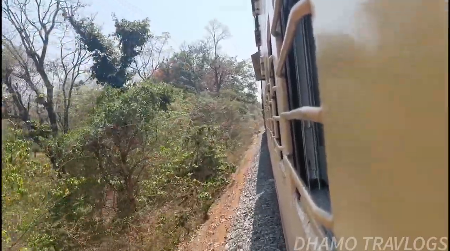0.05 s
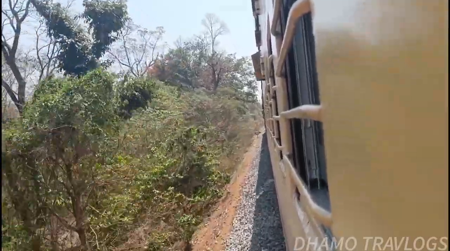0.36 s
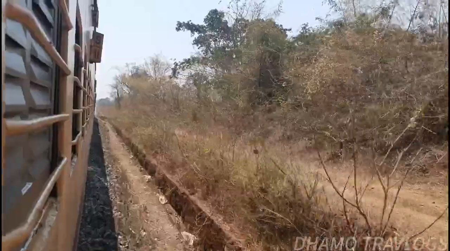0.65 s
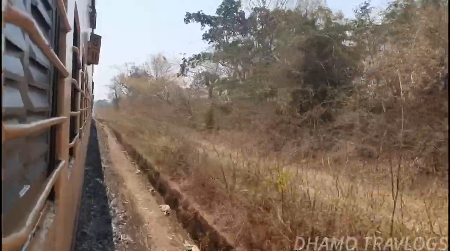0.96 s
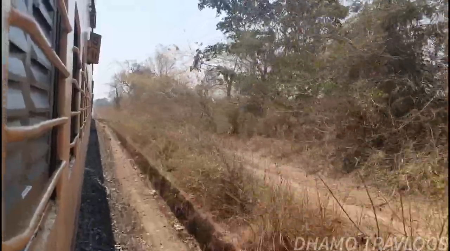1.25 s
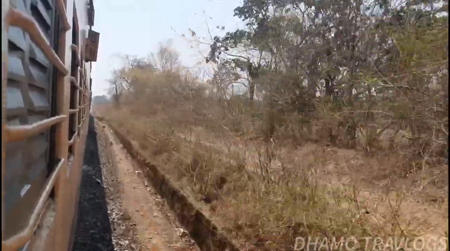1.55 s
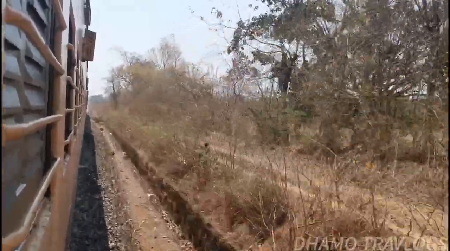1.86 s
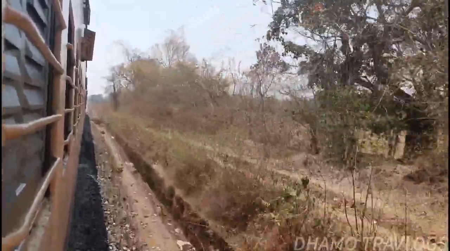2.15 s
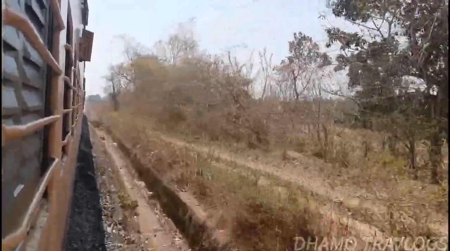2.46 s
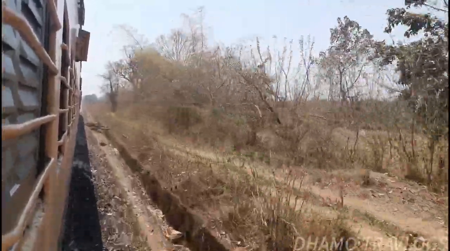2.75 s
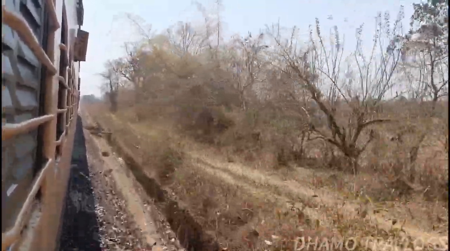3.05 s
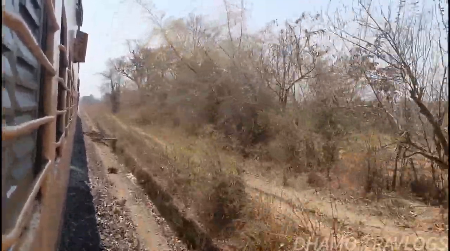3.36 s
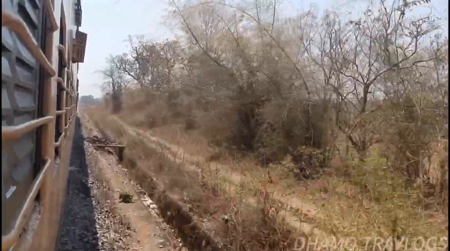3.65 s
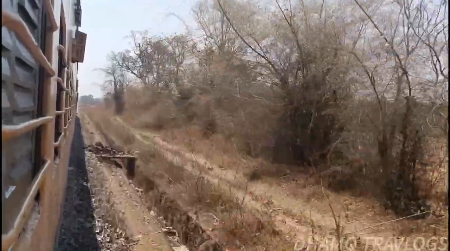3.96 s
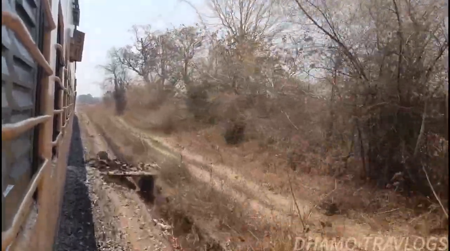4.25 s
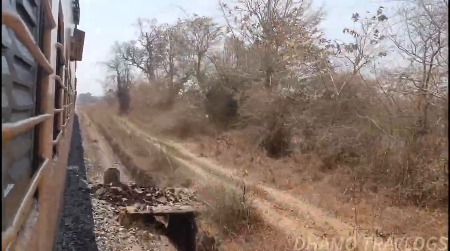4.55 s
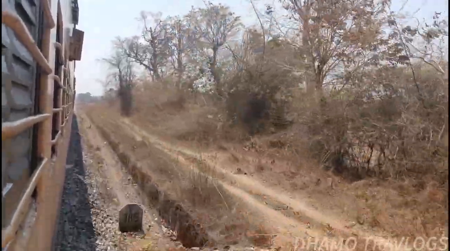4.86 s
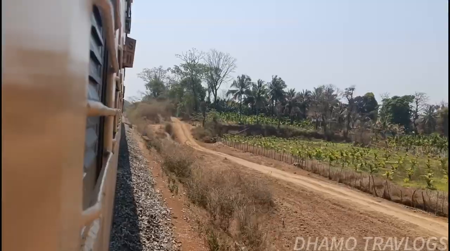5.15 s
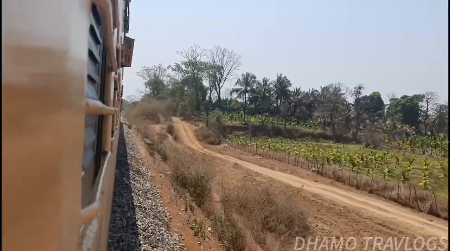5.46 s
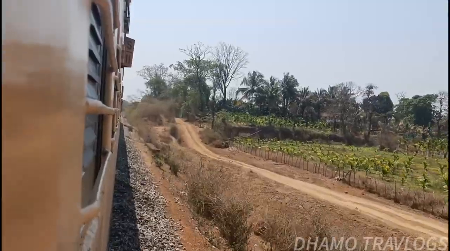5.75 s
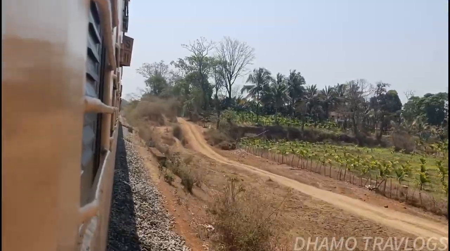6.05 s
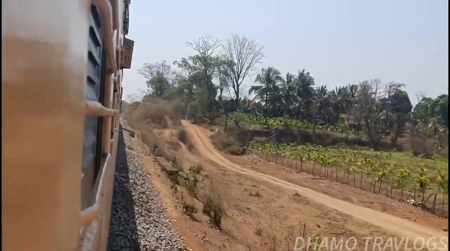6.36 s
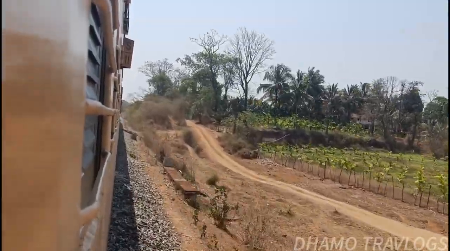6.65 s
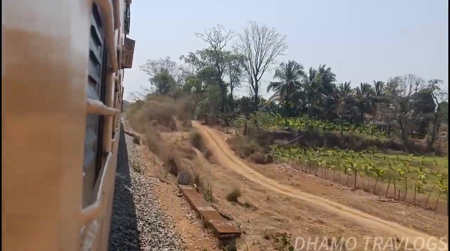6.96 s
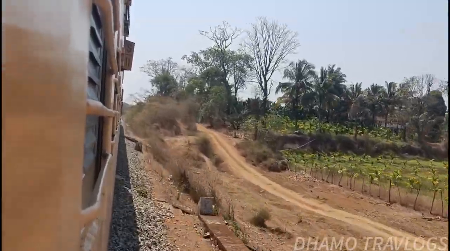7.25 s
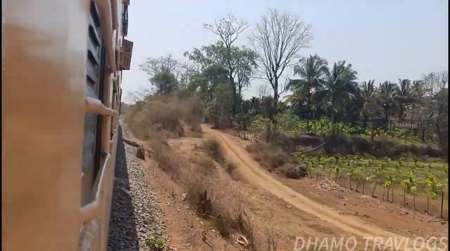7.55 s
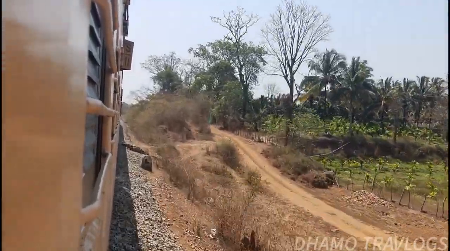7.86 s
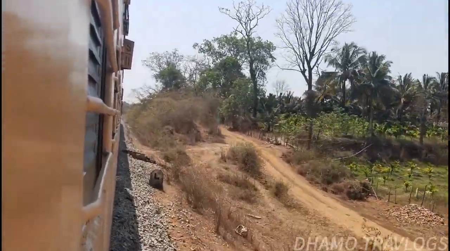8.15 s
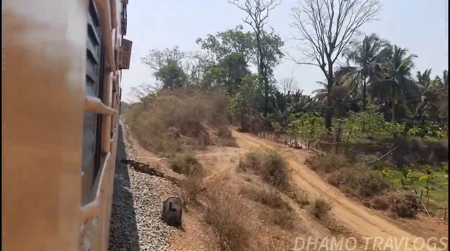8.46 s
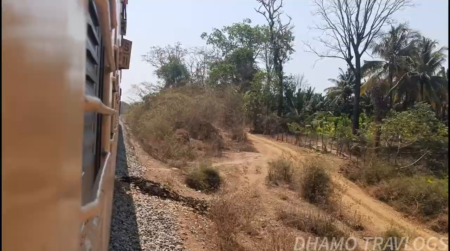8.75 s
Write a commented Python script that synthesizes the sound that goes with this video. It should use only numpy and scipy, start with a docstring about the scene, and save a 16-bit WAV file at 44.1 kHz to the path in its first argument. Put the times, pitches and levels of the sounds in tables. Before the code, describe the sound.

Wind buffets a microphone held outside the window of a moving train. For the first half second it is lighter and mostly on the left, sputtering with tiny whistling blips. At 0.6 seconds the sound cuts out with a click and swells back much louder, stronger on the right, with hollow booming gusts from about 0.8 to 1.6 seconds. Beneath the wind run a steady wheel roar and a low coach drone, while air hisses along the side in fluttering rushes. Dull knocks come from under the floor at around 4 and 4.7 seconds. At 5.1 seconds there is another brief dropout with a tick, and the same wind and rolling fade quickly back in. Faint knocks follow between 5.8 and 6.7 seconds. Sharp gusts hit from about 8 to 8.3 seconds, with firmer knocks near 8.1 and 8.8, and the noise continues until about 9 seconds.

```python
"""Wind at an open train window

A phone is held out of a moving train, in three positions joined by cuts that fade back in.
Turbulent air buffets each microphone port on its own, at point-blank range. From below come the roar
and odd knock of the wheels; along the coach side the slipstream hisses. A fast limiter on each
channel holds the gusts down and makes the roar and hiss flutter behind them."""
import sys
import numpy as np
from scipy import signal
from scipy.fft import rfft, irfft, next_fast_len
from scipy.io import wavfile
from scipy.ndimage import uniform_filter1d, minimum_filter1d

SR = 44100
rng = np.random.default_rng(int(sys.argv[2]) if len(sys.argv) > 2 else 0)


def int16_out(signal):
    """Quantize to a 16-bit WAV file."""
    q = np.round(np.clip(np.atleast_2d(signal).T, -1, 1) * 32767)
    wavfile.write(sys.argv[1], SR, q.astype(np.int16))


N = 396459
TIME = np.arange(N) / SR
SIZE = next_fast_len(N)
HZ = np.maximum(np.arange(SIZE // 2 + 1) * SR / SIZE, 1)
PORT_LAG_S = 0.00015   # sound from the wheels reaches the left port this much later
CUTOFF_HZ = 15400

# wind pressure spectrum at each port: f/Hz, relative level/dB
WIND_LEFT = [(18, -24), (35, -20), (58, -4), (80, -3.5), (115, 2), (200, 0), (290, -7), (400, -9),
             (480, -13), (590, -13.5), (750, -21.5), (1150, -31), (1800, -43.5), (3000, -66), (7000, -83.5),
             (15000, -130)]
WIND_RIGHT = [(18, -36.5), (35, -16), (58, -6), (130, 0.5), (210, -4), (280, -6.5), (380, -7), (470, -15.5),
              (570, -14), (720, -22), (1050, -29.5), (1600, -41.5), (3000, -62), (7000, -89), (15000, -130)]
# gusts (+) and lulls (-) at the microphone: t/s, half length/s, left rise/dB, right rise/dB
GUSTS = [(.02, 0.019, 7.5, 5), (.065, 0.015, 2, -2), (.118, 0.0091, -16, -3), (.155, 0.013, 2, -8),
         (.196, 0.01, -11, -7), (.362, 0.0089, 3, -3), (.46, 0.0075, 4.5, 1), (.578, 0.01, -8, 9),
         (.8, 0.097, -9, 2), (1.0, 0.075, -1.5, 4.5), (1.24, .05, 3.5, -2), (1.38, 0.044, -1, -1),
         (1.52, .05, -0.5, -2), (1.8, 0.05, -4.5, -2.5), (2.3, 0.14, 4.5, -1), (2.87, 0.043, 1, 0),
         (3.08, 0.063, 4, -3), (3.9, 0.14, -10, 2), (4.13, 0.17, 5.5, -4), (4.9, 0.079, -8.5, -3),
         (5.38, 0.21, 3, 5.5), (5.95, 0.039, -5.5, -1), (6.07, 0.024, 9, 0), (6.22, 0.022, 10, -2),
         (6.4, 0.069, -8, -6.5), (6.62, 0.045, -10.5, -7), (6.75, 0.011, 11, 4), (6.85, 0.068, -6, -4),
         (7.06, 0.026, 1, 2), (7.8, 0.061, -5, -0.5), (8.0, 0.041, -4, 11.5), (8.18, 0.031, 5, 2),
         (8.33, 0.02, 9, 9), (8.48, .043, -9.5, -0.5), (8.68, 0.1, -4.5, -3), (8.86, 0.052, 5, -5.5)]
# hardest eddies to slap a port, weighted by band: t/s, half length/s, left rise/dB, right rise/dB
EDDIES = [(.053, .003, 9.5, -5), (.063, 0.004, 8, 1), (.087, 0.0034, 5.5, 5), (.137, .004, -0.5, 3),
          (.163, 0.0044, 5, -2), (.217, 0.0025, 8.5, -8), (.357, 0.0067, 5, 8), (.377, 0.0036, 7.5, 3),
          (.398, .0022, 10, -4), (.46, 0.0018, 9.5, -4), (.526, 0.0066, 5, 0), (2.176, 0.0058, 8, 6),
          (2.232, .0067, 7, 6), (2.358, 0.03, 0.5, 8.5), (3.09, 0.062, 0.5, 5), (3.243, 0.0024, 4, 9.5),
          (3.402, 0.007, -7, 13.5), (4.044, 0.005, 5, 3), (5.342, 0.0027, 4, 11.5), (5.385, .025, 3.5, 6.5),
          (5.735, 0.0076, 4, 8), (6.93, 0.014, 8.5, 2), (8.235, .0029, 7, 18)]
# fineness of the turbulence, which tilts the wind towards the treble: t/s, tilt/dB
FINENESS = [(0, -3), (.6, -2), (.9, 0), (1.1, 4.5), (1.7, -5), (2.5, -1), (3.2, -1.5), (3.7, -13),
            (4.1, -0.5), (5.4, -2.5), (6.6, -11), (7.2, -3.5), (8.98, -12)]
# extra fineness at each port: left/dB, right/dB
PORT_FINENESS = [0.2, 1.34]


def buffet(wind_db, gusting_db, spectrum, port, churn_db, brighten, corner_hz):
    """Wind right on one port (0 left, 1 right); a fast eddy is louder and sheds finer, higher whirls."""
    gust_db = swells(GUSTS, port) + gusting_db * drift(1, 8.7)
    eddy_db = swells(EDDIES, port) + churn_db * drift(14, 45)
    fine_db = in_time(FINENESS) + PORT_FINENESS[port]
    pressure = white() * colour(spectrum)
    octave = np.clip(np.log2(HZ / 100), 0, 5)
    out = 0
    for k in range(6):
        hz = 100 * 2 ** k
        band = to_sound(pressure * np.maximum(1 - abs(octave - k), 0))
        treble = hz / (hz + corner_hz)
        out += band * from_db(eddy_db * (brighten * treble - .24) + fine_db * (2 * treble - .5))
    return from_db(wind_db + gust_db) * out / np.std(to_sound(pressure))


# gusts that boom in the ports: t/s, half length/s, f/Hz, width/Hz, left level/dB, right level/dB
BOOMS = [(0.082, 0.083, 55.3, 45, -20, -34), (0.852, 0.073, 198, 110, -23, 0.5),
         (1.213, 0.081, 232, 150, -9.5, -3), (1.52, 0.096, 183, 74.07, -10.5, -7),
         (6.194, 0.055, 112, 50.7, -12, -18), (8.172, 0.037, 105, 60, -9, -15),
         (8.883, 0.02, 109, 50, -7, -7)]


def booms():
    """Each gust swells and fades in one low, hollow resonance, on its own at each port."""
    out = np.zeros((2, N))
    for s, length, hz, width_hz, *port_db in BOOMS:
        for port, db in enumerate(port_db):
            out[port] += narrow_noise(hz, width_hz) * swells([(s, length, from_db(db))])
    return out


# eddies whistling at the microphone: t/s, half length/s, f/Hz, waver/Hz, level/dB
WHISTLES = [(.016, 0.0028, 1156, 100, -29), (0.051, 0.0035, 1380, 230, -21),
            (0.065, 0.0037, 1170, 100, -21), (0.138, 0.0027, 1066, 80, -31), (.217, .0035, 1050, 80, -24),
            (0.373, 0.0027, 1260, 230, -26), (0.39, 0.024, 595, 12, -21), (.46, 0.0013, 1820, 20, -21)]


def whistles():
    """Air across the left port sounds brief tones whose pitch wavers with the flow."""
    out = 0
    for s, length, hz, waver_hz, db in WHISTLES:
        pitch_hz = hz + waver_hz * drift(20, 120)
        tone = rms_one(np.sin(2 * np.pi * np.cumsum(pitch_hz) / SR))
        out += tone * swells([(s, length, from_db(db))])
    return out


# spectrum of the wheels' roar, heard from the window above: f/Hz, relative level/dB
ROAR = [(30, -22.5), (80, 3.5), (200, 2), (420, -1), (700, -7), (1100, -13), (1400, -19.5), (1800, -27.5),
        (2600, -29.5), (5000, -68)]


def rolling(level_db, coherence=.66, rough_db=1.2, left_db_per_octave=2.1):
    """Rough rail drives the wheels; their roar reaches the right port earlier, fuller and louder."""
    shared = white()
    tone = colour(ROAR) * resonant_colour()
    left_tilt = from_db(left_db_per_octave * np.log2(np.clip(HZ, 100, 1000)))
    ports = []
    for lag_s, tilt, port_db in ((PORT_LAG_S, left_tilt, 0), (0, 1, 4)):
        direct = np.sqrt(coherence) * shared * np.exp(-2j * np.pi * HZ * lag_s)
        diffuse = np.sqrt(1 - coherence) * white()
        ports.append(from_db(port_db) * rms_one(to_sound(tone * tilt * (direct + diffuse))))
    swing_db = .59 * trackside() + swells(RUSHES, column=2) + rough_db * drift(1.1, 8.4)
    return np.array(ports) * from_db(level_db + swing_db)


# steady resonant peaks that colour the roar and hiss: f/Hz, width/Hz, lift/dB
RESONANCES = [(585, 70, 2), (850, 110, 6.5), (1100, 120, 3), (1900, 160, 2.5), (2305, 150, 4.5),
              (2460, 120, 2.5), (2800, 260, -2), (2990, 190, 4), (3730, 170, 3), (3950, 150, 2),
              (4230, 120, 4), (6050, 160, 2), (9960, 40, 4), (11700, 600, 3)]


def resonant_colour():
    """Gain at every frequency from the fixed resonant peaks that colour the roar and hiss."""
    return from_db(sum(db / (1 + (2 * (HZ - hz) / width) ** 2) for hz, width, db in RESONANCES))


# knocks of the running gear under the coach: t/s, level/dB, f/Hz rung most
KNOCKS = [(2.035, -25, 500), (4.037, -16, 680), (4.738, -10, 620), (4.92, -18, 500), (5.782, -13, 620),
          (6.4, -18, 880), (6.645, -17, 900), (6.735, -16, 456), (8.11, -17, 900), (8.138, -7, 365),
          (8.162, -16, 365), (8.837, -9, 540), (8.858, -20, 500)]
# modes of the bogie: f/Hz, relative level/dB, t60/s
BOGIE_MODES = [(115, 11.5, .15), (212, -3, .12), (382, 2.5, 0.11), (493, -0.5, 0.13), (581, -3, 0.1),
               (720, -3, 0.057), (784, 1, 0.15), (856, -3, .13)]


def knocks(chatter_s=.012, chatter_share=.45, spread_octaves=.29):
    """Under the floor, a blow and its short chatter ring the bogie, most near the knock's own pitch."""
    out = np.zeros(N + SR)
    age = np.arange(SR // 4) / SR
    hz, mode_db, t60 = np.transpose(BOGIE_MODES)[:, :, None]
    modes = from_db(mode_db) * np.exp(-np.log(1000) * age / t60) * np.sin(2 * np.pi * hz * age)
    for s, level_db, pitch_hz in KNOCKS:
        ring = np.sum(modes / (1 + (np.log2(hz / pitch_hz) / spread_octaves) ** 2), axis=0)
        chatter = rng.standard_normal(len(age)) * np.exp(-age / chatter_s)
        force = (age == 0) + chatter_share * chatter / np.linalg.norm(chatter)
        out[int(s * SR):][:len(age)] += from_db(level_db) * signal.fftconvolve(force, ring)[:len(age)]
    right = out[:N]
    left = np.interp(TIME - PORT_LAG_S, TIME, right)
    return np.array([left, right])


def rumble(hz=55.7, width_hz=26, level_db=-22.5, rise_s=.35):
    """The coach body drones beside the phone once it is out in the open, from the second position on."""
    swell = np.clip((TIME - POSITIONS[1][0]) / rise_s, 0, 1)
    return from_db(level_db) * swell * np.array([narrow_noise(hz, width_hz) for _ in range(2)])


# slipstream spectrum at each port: f/Hz, relative level/dB
SLIPSTREAM_LEFT = [(500, -19), (1300, 1.5), (2100, 2), (2700, 2.5), (4200, -1.5), (5300, -4.5), (6500, -6),
                   (7400, -11), (8600, -17.5), (10000, -16.5), (12000, -19), (15000, -22.5)]
SLIPSTREAM_RIGHT = [(500, -20), (1300, -5.5), (2200, 2.5), (2800, 0.5), (4200, 0.5), (5200, -2), (6200, 1),
                    (7000, -5.5), (8500, -20.5), (11000, -27), (13800, -23), (15500, -26)]
# rushes (+) and lulls (-) along the coach: t/s, half length/s, left hiss/dB, right hiss/dB, roar/dB
RUSHES = [(.02, 0.033, 5, 5, 3), (.118, .009, -2, 1, -4), (.578, .012, -2, -2, -14), (.78, 0.096, 10, 7, 6),
          (.875, 0.028, 2, 4.5, 0.5), (.94, 0.04, 3, 6.5, 1), (1.7, .025, -1, 6.5, 1),
          (2.05, 0.027, -1.5, 3.5, -2), (2.16, 0.029, 1, -4, 0.5), (2.36, 0.016, -1, 5.5, 6.5),
          (2.79, 0.051, 2, 4.5, -3.5), (2.94, 0.027, 2, 8, 0), (3.04, 0.036, -3, -3, -2),
          (3.22, 0.045, -4.5, 0.5, -2), (3.38, 0.034, -0.5, 5, -3), (3.62, 0.062, 0, 8.5, 2),
          (3.87, 0.04, -1, 8.5, 2.5), (4.03, 0.036, 1, -4, 2), (4.56, .04, 0, 4, 0),
          (4.82, 0.027, -1, 4, -1.5), (4.93, 0.01, -2, 9, 3), (5.785, 0.022, 0, 4.5, 5.5),
          (5.99, 0.041, 1, -8, 1.5), (6.1, 0.037, 4, 4, 3), (6.29, 0.055, 1, 6, 1.5),
          (6.67, 0.026, 1, 8.5, 6), (6.85, 0.047, -6, -1.5, -9), (7.32, 0.017, 1, -3, -5),
          (7.385, 0.014, 2, 9, 4), (7.565, 0.089, 1.5, 7.5, 1.5), (7.69, 0.02, 1, 5, -2.5),
          (7.75, 0.015, 2, -3.5, 0), (7.97, 0.056, 1, 2, 0), (8.14, 0.041, 3, 9, 4),
          (8.6, 0.28, 1, -1.5, -1), (8.92, 0.056, -1, 6, 1.5)]
HISS_FOLLOWS = .52   # share of the trackside swing that the hiss and the singing take on


def hiss(level_db, spectrum, port, flutter_db, bite_hz=2830, bite_width_hz=1600):
    """Air along the coach side, coloured by resonant peaks; faster air sizzles more, rushes bite."""
    air = white() * colour(spectrum) * resonant_colour()
    flow_db = level_db + HISS_FOLLOWS * trackside()
    rush_db = swells(RUSHES, port)
    top = 1 / (1 + (7800 / HZ) ** 12)
    body = to_sound(air * (1 - top))
    bite = to_sound(air * resonance(bite_hz, bite_width_hz)) * (from_db(.3 * rush_db) - 1)
    sizzle = to_sound(air * top) * from_db(.35 * (flow_db - np.median(flow_db)) - .25 * rush_db)
    gain = from_db(flow_db + rush_db + flutter_db * drift(2.7, 30))
    return gain * (body + bite + sizzle) / np.std(body)


# thin tones from the wheels below: f/Hz, width/Hz, mean level/dB
WHEEL_TONES = [(2297, 100, -52), (4180, 100, -60.5)]


def singing(waver_db=2):
    """In the second position each wheel tone sways on its own, louder where the trackside returns it."""
    out = 0
    for hz, width_hz, level_db in WHEEL_TONES:
        gain = from_db(level_db + waver_db * drift(.8, 3.5))
        out += gain * np.array([narrow_noise(hz, width_hz) for _ in range(2)])
    return out * from_db(HISS_FOLLOWS * trackside()) * in_second_position()


def fizz(start_s=.887, hold_s=.06, decay_s=.015, level_db=-50, edge_hz=11800):
    """A faint, very high fizz at the left port starts at once, holds briefly and dies."""
    noise = rms_one(to_sound(white() / (1 + (edge_hz / HZ) ** 8) * (HZ < CUTOFF_HZ)))
    envelope = (TIME >= start_s) * np.exp(-np.maximum(TIME - start_s - hold_s, 0) / decay_s)
    return from_db(level_db) * noise * envelope


# sound thrown back from the lineside, weak over open ground, strong by thickets: t/s, relative level/dB
TRACKSIDE = [(1.1, -61.5), (1.15, -64), (2.17, -62.5), (2.31, -72.5), (2.98, -70.5), (3.07, -71),
             (3.98, -64.5), (4.3, -68.5), (5.05, -63.5)]


def trackside():
    """Swing in dB of the reflected sound about its mean, in the second position only."""
    level_db = in_time(TRACKSIDE)
    passing = in_second_position()
    return passing * (level_db - level_db[passing].mean())


# microphone positions at the window, the right port sheltered in the first; levels are relative:
# t/s, left wind/dB, right wind/dB, random gusting/dB, roar/dB, left hiss/dB, right hiss/dB
POSITIONS = [(0, -17, -31.5, 1.0, -51, -55.5, -60.5), (.625, -14, -.5, 2, -24, -40.5, -40.5),
             (5.12, -16.5, -5.5, 2, -25.5, -39, -40)]


def position_levels():
    """The levels at the microphone at every sample, held until the next position starts."""
    starts, *levels = np.transpose(POSITIONS)
    return np.array(levels)[:, np.searchsorted(starts[1:], TIME)]


def in_second_position():
    """True while the phone is in its second position."""
    return (TIME >= POSITIONS[1][0]) & (TIME < POSITIONS[2][0])


def from_db(db):
    """Decibels to gain."""
    return 10 ** (np.asarray(db) / 20)


def rms_one(x):
    """Scale to rms 1."""
    return x / np.sqrt(np.mean(x ** 2) + 1e-20)


def in_time(rows):
    """A curve read at every sample."""
    return np.interp(TIME, *np.transpose(rows))


def swells(rows, column=0):
    """Bell-shaped rises and dips, with heights from one column of the rows."""
    t = TIME[::11]
    bells = sum(heights[column] / np.exp(np.minimum(.5 * ((t - s) / length) ** 2, 20))
                for s, length, *heights in rows)
    return np.interp(TIME, t, bells)


def colour(points):
    """Gain at every frequency, joined on a log axis."""
    hz, db = np.transpose(points)
    return from_db(np.interp(np.log(HZ), np.log(hz), db))


def resonance(hz, width_hz):
    """Gain of one steep-sided band."""
    return 1 / (1 + (2 * (HZ - hz) / width_hz) ** 4)


def white():
    """Spectrum of fresh white noise."""
    return rfft(rng.standard_normal(SIZE))


def to_sound(spectrum):
    """Spectrum to samples."""
    return irfft(spectrum, SIZE)[:N]


def narrow_noise(hz, width_hz):
    """Noise in one resonance; rms 1."""
    return rms_one(to_sound(white() * resonance(hz, width_hz)))


def drift(slow_hz, fast_hz):
    """Random swaying between two rates; rms 1."""
    return rms_one(to_sound(white() * HZ / (HZ + slow_hz) / (1 + (HZ / fast_hz) ** 2)))


def scene():
    """Just outside the window: wind and hiss at each port, the running train below."""
    wind_left, wind_right, gusting, roar_db, hiss_left, hiss_right = position_levels()
    left = buffet(wind_left + 2.6, gusting, WIND_LEFT, port=0,
                  churn_db=1.9, brighten=3.7, corner_hz=800)
    right = buffet(wind_right + .37, gusting, WIND_RIGHT, port=1,
                   churn_db=2.15, brighten=2.45, corner_hz=684)
    left += hiss(hiss_left, SLIPSTREAM_LEFT, port=0, flutter_db=1.14) + whistles() + fizz()
    right += hiss(hiss_right + 3.5, SLIPSTREAM_RIGHT, port=1, flutter_db=1.66)
    return np.array([left, right]) + rolling(roar_db + 4) + booms() + rumble() + singing() + knocks()


def limiter(x, ceiling_db=-.9, release_db_per_s=215):
    """The phone turns each channel down just ahead of a peak and recovers quickly."""
    over_db = np.maximum(20 * np.log10(abs(x) + 1e-9) - ceiling_db, 0)
    recovery = release_db_per_s * TIME
    held_db = np.maximum.accumulate(over_db + recovery, axis=1) - recovery
    ahead_db = minimum_filter1d(-held_db, size=89)
    return x * from_db(uniform_filter1d(ahead_db, size=89))


# cuts between positions: t/s, gap/s, gap level/dB, fade-in/s, starting level/dB
CUTS = [(0.614, .023, -55.5, 0.38, -14), (5.114, 0.016, -26, 0.3, -16.5)]


def cuts():
    """At each cut the sound drops away at once, then swells back."""
    gain = np.minimum(np.arange(N) / 88, 1)   # 2 ms opening fade
    for s, gap, gap_db, fade, depth_db in CUTS:
        to_go = np.clip(1 - (TIME - s - gap) / fade, 0, 1)
        gain *= from_db(np.select([TIME < s, TIME < s + gap], [0, gap_db], depth_db * to_go ** 2.38))
    return uniform_filter1d(gain, size=15)


# sharp ticks on the left channel: t/s, height/full scale, decay/s
TICKS = [(0.6137, 0.49, 0.00051), (.888, 0.3, .00001), (5.114, 0.34, 0.0001)]


def ticks():
    """Sudden steps that die away at once."""
    left = sum(height * (TIME >= s) * np.exp(-abs(TIME - TIME[int(s * SR) + 1]) / decay)
               for s, height, decay in TICKS)
    return np.array([left, np.zeros(N)])


def record(dry):
    """After the microphone: limiter, cuts, ticks and a steep top edge."""
    held = limiter(dry) * cuts() + ticks()
    lowpass = signal.ellip(10, .1, 80, CUTOFF_HZ, fs=SR, output="sos")
    return signal.sosfilt(lowpass, held)


dry = scene()
out = record(dry)
int16_out(out)
```